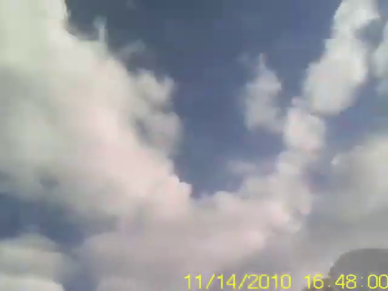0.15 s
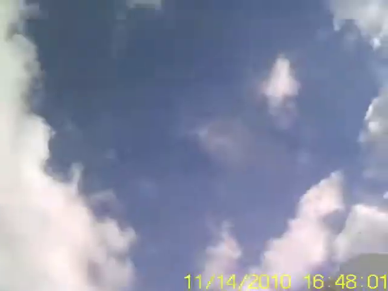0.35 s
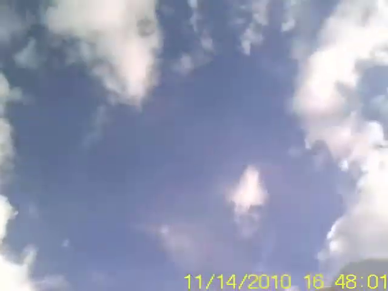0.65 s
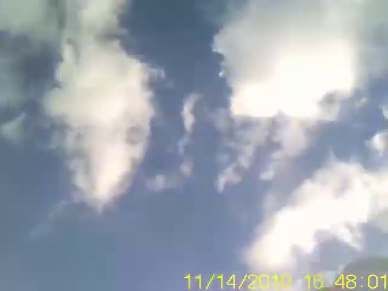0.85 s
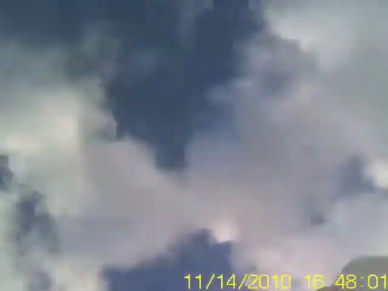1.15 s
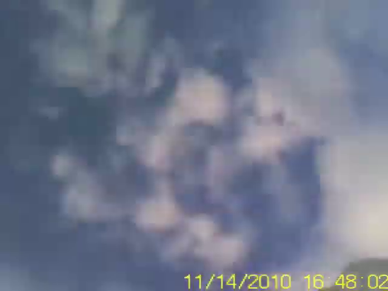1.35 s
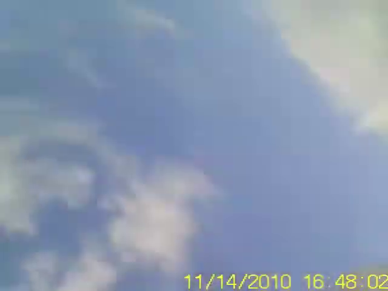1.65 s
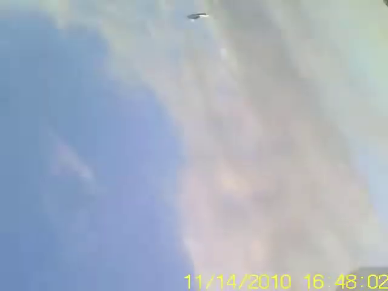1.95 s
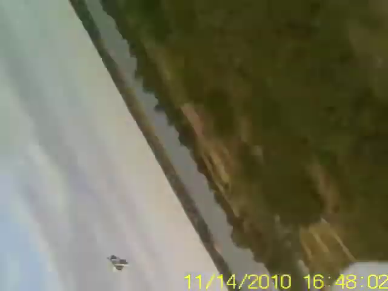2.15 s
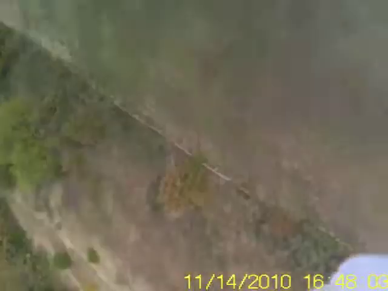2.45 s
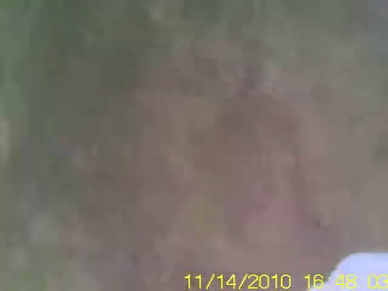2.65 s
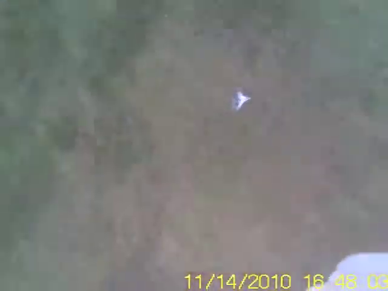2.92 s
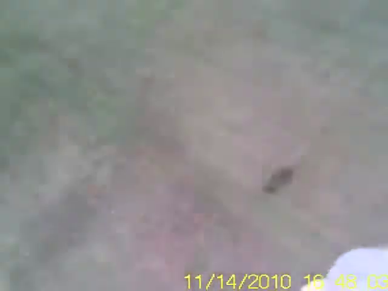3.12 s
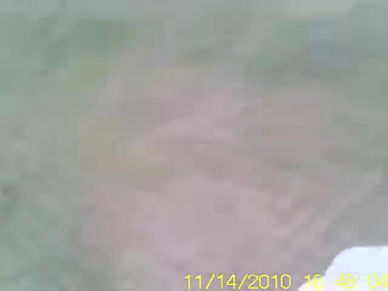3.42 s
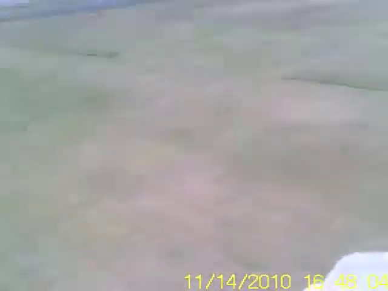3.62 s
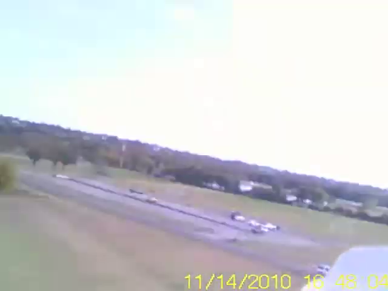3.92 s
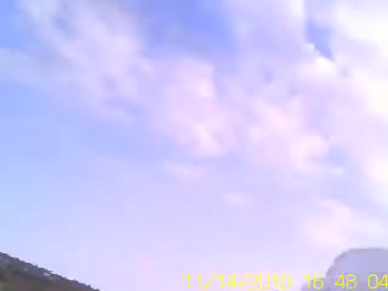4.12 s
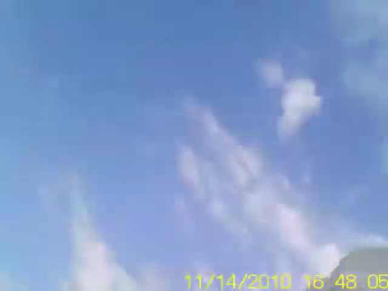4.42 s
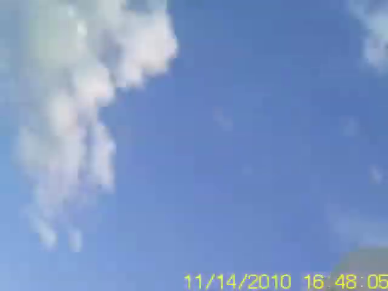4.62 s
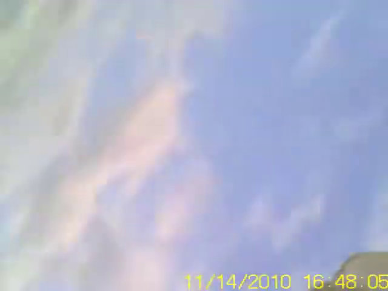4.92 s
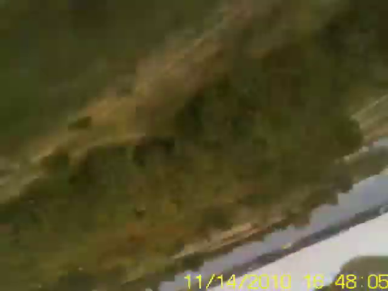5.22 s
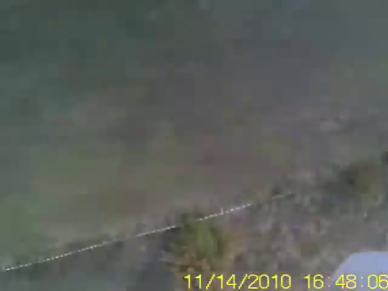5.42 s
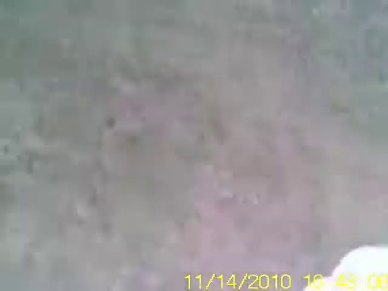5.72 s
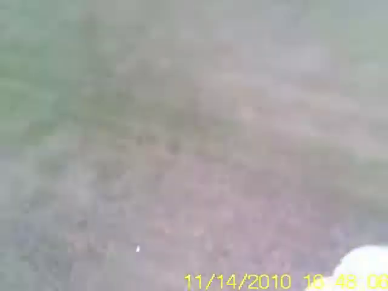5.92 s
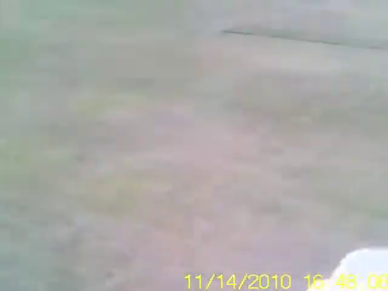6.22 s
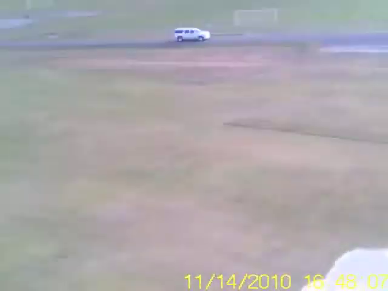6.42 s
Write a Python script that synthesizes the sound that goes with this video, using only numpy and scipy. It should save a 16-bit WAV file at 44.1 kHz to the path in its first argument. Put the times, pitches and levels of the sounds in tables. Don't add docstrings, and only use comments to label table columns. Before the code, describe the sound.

A small electric model aircraft buzzes close up in roaring air, cuts abruptly to faint after a hard wind slap, then gradually grows louder again.

```python
import sys
import numpy as np
from scipy import signal
from scipy.io import wavfile
from scipy.ndimage import uniform_filter1d

SR = 44100
rng = np.random.default_rng(int(sys.argv[2]) if len(sys.argv) > 2 else 0)


def persist_wave(psi):
    counts = np.round(np.clip(psi, -1, 1) * 32767).astype(np.int16)
    wavfile.write(sys.argv[1], SR, np.atleast_2d(counts).T)


def nominal_scale(level):
    x = np.asarray(level, float) / 20
    return 10 ** x


N = 289296


def rms_one(x):
    return x / np.sqrt(np.mean(x ** 2) + 1e-20)


def in_time(rows):
    s, *columns = np.transpose(rows)
    return [np.interp(np.arange(N) / SR, s, c) for c in columns]


def swells(rows):
    s, half, *columns = np.transpose(rows)
    coarse = np.arange(0, N + 64, 64) / SR
    bells = np.exp(-((coarse[:, None] - s) / half) ** 2)
    return [np.interp(np.arange(N) / SR, coarse, bells @ c) for c in columns]


def drift(rate_hz):
    r = np.exp(-40 * np.pi * rate_hz / SR)
    slow = signal.lfilter([1], [1, -2 * r, r * r], rng.standard_normal(N // 20 + 4002))[4000:]
    return np.interp(np.arange(N) / 20, np.arange(len(slow)), rms_one(slow))


def narrow_noise(rows, width_hz):
    hz, level_db = in_time(rows)
    turn = 2 * np.pi * np.cumsum(hz) / SR
    return nominal_scale(level_db) * (drift(width_hz) * np.cos(turn) + drift(width_hz) * np.sin(turn))


# [t/s, airspeed/dB, sideslip/dB, pull on the wing/dB]
FLIGHT_PATH = [(0.0, 2, 0.3, 4.5), (0.34, -1, 5.5, -1), (0.74, -4, -2.5, 1.5), (1.1, -2.0, -0.5, -1.5),
               (1.38, -3.5, -4, -4), (1.78, -4.0, -5, -1), (2.38, -3.5, -0.8, 3.5), (2.74, -1.5, 0.5, 6),
               (2.98, 2.5, 1.2, 2), (3.46, 5, -2, 1.5), (4.42, 5.5, -0.7, -3), (4.7, 2, 7, -0.5),
               (4.98, 1, 0.5, -3), (5.34, -1, -1, -4), (5.58, 2.4, 7, 1), (5.86, 4.5, 2, -5.5),
               (6.14, 1.1, 3, 0.5), (6.56, 4, -6.5, 9.5)]


def flying():
    return in_time(FLIGHT_PATH)


# [t/s, f/Hz]
SHAFT_SPEED = [(0, 269), (.12, 266.5), (.55, 266.5), (.7, 267.7), (1.95, 268.1), (2.35, 267.4),
               (2.85, 267.9), (3.0, 267.1), (3.5, 268.1), (4.4, 268.1), (4.7, 266.3), (5.12, 265.8),
               (5.22, 266.7), (5.7, 266.4), (5.85, 263.8), (6.1, 263.9), (6.4, 271.6), (6.56, 280)]


def shaft_angle(airspeed_db):
    speed_hz = in_time(SHAFT_SPEED)[0] + .13 * nominal_scale(airspeed_db) * drift(6)
    return 2 * np.pi * np.cumsum(speed_hz) / SR


SHAFT_ORDERS = [*range(1, 17), *range(18, 23), *range(24, 41, 2)]
# [level/dB rms, gain per dB of airspeed, of sideslip, of pull]
ORDER_LEVELS = [(-33, 0.01, -0.18, -0.22), (-30, 1.04, -0.27, -0.21), (-37.5, -1.27, 0.077, 0.39),
                (-26.5, -0.07, 0.098, 0.27), (-42, -0.23, 0.5, 0.21), (-25.5, 0.56, 0.27, 0.18),
                (-47.5, -0.4, 0.18, 1), (-33.5, 0.56, -1.34, 0.2), (-45, -1.1, 0.46, 0.76),
                (-26, -0.7, -0.026, -0.3), (-42.5, 0.53, -0.29, -0.54), (-30, 0.14, 0.31, -0.079),
                (-47.5, -0.2, 0.09, -0.04), (-29.5, -0.16, 0.17, -0.31), (-40.6, -0.02, 0.054, -0.11),
                (-50.2, -0.09, 0.52, 0.32), (-58, 0.7, -0.01, 0.26), (-61.5, 0.5, 0.29, 0.04),
                (-61.5, 1.5, -0.93, -0.05), (-49.5, 0.83, -0.21, -0.04), (-53, 1, 0.45, 0.04),
                (-54, 0.59, 0.19, 0.0), (-59.1, 1.2, -0.083, 0.26), (-59, 1.6, -0.39, -0.13),
                (-50.5, -0.5, 0.24, 0.4), (-50, -0.26, -0.11, 0.27), (-60.5, -1, -0.17, 0.47),
                (-56, 0.09, -0.06, 0.21), (-67, -3, 0.01, 0.01)]
# [level/dB rms, gain per dB of airspeed, of sideslip, of pull]
FIFTEENTH_ORDER = (-54.5, 0.5, .01, -0.1)
# [f/Hz, sharpness, sign]
AIRFRAME_MODES = [
    (2500, 5, 1),
    (3150, 10, 1),
    (3450, 10, -1),
]
LOWER_ORDER_BEATS = {"1": [(.53, 0.035, -3), (2.0, 0.32, 3.5), (3.3, 0.11, -5.5), (5.03, .07, 7),
                     (5.5, .04, -9)], "2": [(.55, .06, 1), (1.45, 0.14, 1.5), (2.4, .06, -3),
                     (5.95, 0.22, -7)], "3": [(.1, .15, 0.5), (1.3, 0.18, -1.5), (2.5, 0.13, -1.5),
                     (3.0, .15, 3), (3.33, 0.083, -15), (5.7, .04, -8), (5.93, .05, -12)],
                     "6": [(.8, 0.17, 2), (1.3, .15, -1), (2.25, .15, -0.5), (5.0, .3, -2)],
                     "8": [(.29, .05, -13), (2.55, .1, 3), (2.98, .06, -5), (3.23, 0.064, 2),
                     (4.62, .05, 3), (4.75, .07, -5), (5.56, .08, -6), (6.0, .08, 4), (6.17, .06, -5)],
                     "12": [(.95, .25, 2.5), (1.65, 0.11, -1.5), (2.15, 0.22, 3), (6.33, 0.087, -9)],
                     "14": [(.8, .2, 0.5), (2.5, 0.23, 2.5), (3.3, 0.35, 3), (6.47, 0.1, -9)]}
UPPER_ORDER_BEATS = {"20": [(.22, .12, 8), (3.2, .1, 6), (4.0, .25, 6), (5.2, .3, 6), (6.3, .2, 6)],
                     "22": [(.25, 0.17, 3.5), (1.4, .15, 4), (2.1, .3, -3), (5.2, .4, -3)],
                     "24": [(.75, 0.29, -7), (2.05, 0.27, 7), (2.47, 0.065, -10.5), (5.25, .2, -7),
                     (5.95, .2, 6)], "26": [(.55, .2, -4), (1.1, .1, 4), (5.1, .35, -7), (5.75, .15, 4.5)]}
CRUISE_HZ = 268


def propeller(angle, flight, rush_db, rough=0.0082, jitter_hz=70):
    shake = rough * nominal_scale(.8 * (rush_db + 31))
    beats = {**LOWER_ORDER_BEATS, **UPPER_ORDER_BEATS}
    levels = [*ORDER_LEVELS[:14], FIFTEENTH_ORDER, *ORDER_LEVELS[14:]]
    out = np.zeros(N)
    for order, (level_db, *follows) in zip(SHAFT_ORDERS, levels):
        odd = order % 2
        wander_db = (.2 + odd * min(order / 8, 1.3) + .6 * (order > 17)) * drift(1.5)
        level_db = level_db + wander_db + np.dot(follows, flight)
        if str(order) in beats:
            level_db += swells(beats[str(order)])[0]
        ratios = [(order * CRUISE_HZ / hz, q, sign) for hz, q, sign in AIRFRAME_MODES]
        lag = sum(sign * np.arctan2(r / q, 1 - r ** 2) for r, q, sign in ratios)
        lag += odd * np.pi / 2
        turn = order * angle - lag + .01 * order * (1 + 4 * odd) * drift(1.2)
        tone = (1 + shake * drift(jitter_hz)) * np.cos(turn) + shake * drift(jitter_hz) * np.sin(turn)
        out += np.sqrt(2) * nominal_scale(level_db) * tone
    return out


# [middle t/s, half length/s, level/dB]
CONTROLLER_SWELLS = [
    (.45, 0.11, -5),
    (.8, .2, 3),
    (2.42, 0.13, 2.5),
    (2.65, .08, -4),
    (4.82, 0.059, -5),
]
SWITCHING_HZ, SWITCHING_DB = 7607, -47


def controller(angle):
    chop = 1 + 0.049 * np.cos(angle) + 0.062 * np.cos(12 * angle)
    level_db = SWITCHING_DB + swells(CONTROLLER_SWELLS)[0] + .5 * drift(3.6)
    return np.sqrt(2) * nominal_scale(level_db) * chop * np.cos(2 * np.pi * SWITCHING_HZ * np.arange(N) / SR)


# [level/dB, gain per dB of airspeed, of sideslip, of pull]
AIR_LEVELS = [
    (-26, 1.24, 0.036, .52),
    (-32, 0.96, 0.59, -0.19),
    (-29.5, 0.62, 0.34, -0.049),
    (-42.5, 0.53, 0.047, -0.22),
]
# [middle t/s, half length/s, rumble level/dB, buffet level/dB, rush level/dB]
PASSING_EDDIES = [(.05, 0.045, -2, 6.5, 3), (.58, 0.17, 5, -0.5, 1), (.85, 0.079, -2, 5, 1.5),
                  (1.02, 0.056, -5, .1, 1), (1.25, 0.24, 0.5, 6.5, 1.5), (1.85, 0.29, -3, -10, 0.9),
                  (2.2, 0.14, 1.5, -2.5, 1.5), (2.57, 0.15, 2, 0.5, 1.3), (2.9, 0.04, 5, -3, 3),
                  (3.13, 0.12, -1, -2.5, 2.5), (3.45, 0.035, 6, 1.5, 5.5), (3.85, 0.16, 1.5, 4.5, 2.5),
                  (4.1, 0.33, 4, -2, 2), (4.54, 0.14, 0, 1.5, 4), (4.68, 0.074, -7, -4, -1),
                  (5.0, 0.12, 4.5, 11.5, 1), (5.2, 0.14, -2, -6, -2.5), (5.42, 0.11, 10, -10, .1),
                  (5.85, 0.16, 2, -6.5, 0.3), (6.2, .05, -4, 2, 1), (6.35, .06, 3, -3, -0.5)]
# [middle t/s, half length/s, hiss level/dB]
LEADING_EDGE_HISS = [
    (1.1, .07, 1.5),
    (1.95, .15, 2),
    (5.9, 0.17, 0),
    (6.35, 0.11, -2),
]


def air_levels(flight):
    rumble, buffet, rush = swells(PASSING_EDDIES)
    eddies = [rumble, buffet, rush, rush + swells(LEADING_EDGE_HISS)[0]]
    return [db + eddy + np.dot(follows, flight) for (db, *follows), eddy in zip(AIR_LEVELS, eddies)]


# [f/Hz, level/dB]
PORT_COLOUR = [(12, 28.5), (35, 22.5), (150, 18), (400, 13), (1000, 5.5), (2200, 5.5), (3700, 2.5),
               (4500, -12), (5100, -4.5), (6000, 7), (7300, -3.5), (8700, 9.5), (9800, 0.5), (10900, 13.5)]


def airflow(angle, levels_db, shed=0.72, patchy_db=1.2):
    white = rng.standard_normal((2, N + SR))
    edges = 14 * 2 ** np.r_[np.arange(0, 8, 1 / 3), np.arange(8, 9.7, 1 / 8)]
    puffs = rms_one(np.exp(.75 * np.cos(2 * angle + shed)) * nominal_scale(1.3 * drift(150)))
    colour_hz, colour = np.transpose(PORT_COLOUR)
    together, low, high = drift(13.0), 0, 0
    for k, (a, b) in enumerate(zip(edges, edges[1:])):
        hz = np.sqrt(a * b)
        band_pass = signal.butter(2, [a, b], "band", fs=SR, output="sos")
        band = signal.sosfilt(band_pass, white[k % 2])[SR:]
        place = np.interp(np.log(hz), np.log([55, 220, 900, 3700, 4700, 8000]), [0, 1, 2, 2, 2.5, 3])
        first = min(int(place), 2)
        level_db = levels_db[first] + (place - first) * (levels_db[first + 1] - levels_db[first])
        colour_db = np.interp(np.log(hz), np.log(colour_hz), colour)
        lumps_db = patchy_db * (together * max(1.6 - 0.97 * place, .2) + .5 * drift(9.8))
        low_shelf_db = -3.5 * np.clip(np.log2(160 / hz), 0, 1) - 3 * np.clip(np.log2(50 / hz), 0, 1)
        band = band * nominal_scale(level_db + colour_db + lumps_db + low_shelf_db)
        if hz < 5200:
            low = low + band
        else:
            high = high + band
    return low + signal.sosfilt(signal.butter(10, 9600, fs=SR, output="sos"), puffs * high)


def heave(rumble_db):
    return nominal_scale(rumble_db + 2.5) * drift(1.8)


# [f/Hz, width/Hz, level over the rush/dB]
HUMMING_PANELS = [
    (2060, 90, -15.5),
    (3138, 110, -16),
    (4590, 240, -26.5),
]


def panels(rush_db):
    hum = sum(narrow_noise([(0, hz, db), (N / SR, hz, db)], width) for hz, width, db in HUMMING_PANELS)
    return nominal_scale(rush_db) * hum


# [loudest t/s, slide/Hz per s, level/dB]
EDGE_WHISTLES = [
    (0.269, -4500, -48),
    (2.74, 4803, -48),
    (5.541, 5504, -47),
]
WHISTLE_HZ, WHISTLE_WIDTH_HZ = 9060, 450
WHISTLE_HOLD_S, WHISTLE_FADE_S, WHISTLE_FADE_DB = .13, .22, -4


def whistle():
    away = np.array([-2, -1, -.5, .5, 1, 2]) * (WHISTLE_HOLD_S + WHISTLE_FADE_S)
    away[2:4] = -WHISTLE_HOLD_S, WHISTLE_HOLD_S
    fade_db = WHISTLE_FADE_DB * np.array([8, 1, 0, 0, 1, 8])
    out = 0
    for s, slide, db in EDGE_WHISTLES:
        hz = np.clip(WHISTLE_HZ + slide * away, 8000, 10800)
        out = out + narrow_noise(np.c_[s + away, hz, db + fade_db], WHISTLE_WIDTH_HZ)
    return out


# [start t/s, length/s, pressure]
PORT_SHOVES = [
    (0.91, .04, .14),
    (1.0, .02, .13),
    (1.025, .06, -.08),
    (1.12, .07, .1),
    (3.125, .03, .22),
    (3.414, .06, -.36),
    (3.419, .007, .1),
    (3.426, .045, -.08),
    (3.448, .02, -.14),
    (3.66, .06, -.25),
]


def gusts():
    t = np.arange(N) / SR
    out = np.zeros(N)
    for start, length, pressure in PORT_SHOVES:
        out += pressure * (np.tanh((t - start) / .0015) - np.tanh((t - start - length) / .008)) / 2
    return out


# [t/s, f/Hz, level/dB]
FLOW_BURSTS = [
    (4.42, 444, -60),
    (4.48, 445.3, -28.5),
    (4.6, 453.5, -25),
    (4.68, 450, -60),
    (5.44, 298, -60),
    (5.455, 303, -19.5),
    (5.5, 301, -27),
    (5.58, 304, -23),
    (5.63, 298, -60),
]


def bursts():
    return narrow_noise(FLOW_BURSTS, 170)


# [t/s, f/Hz, level/dB]
PANEL_FLUTTER = [
    (4.74, 210, -53),
    (4.8, 202, -21),
    (4.9, 142.5, -22),
    (5.03, 160.5, -30),
    (5.09, 193, -60),
]


def flutter():
    return narrow_noise(PANEL_FLUTTER, 45)


# [t/s, f/Hz, level/dB]
CANOPY_HISS = [
    (5.5, 4500, -65),
    (5.7, 4500, -46.5),
    (6.1, 4530, -43),
    (6.25, 4500, -65),
]


def canopy():
    return narrow_noise(CANOPY_HISS, 260)


def scene():
    flight = flying()
    angle = shaft_angle(flight[0])
    levels_db = air_levels(flight)
    rumble_db, rush_db = levels_db[0], levels_db[2]
    drive = propeller(angle, flight, rush_db) + controller(angle)
    air = airflow(angle, levels_db) + heave(rumble_db) + panels(rush_db) + whistle() + gusts()
    air += bursts() + flutter() + canopy()
    return (drive + air)[None]


def roll_off(x):
    return signal.sosfilt(signal.butter(12, 10890, fs=SR, output="sos"), x)


GAIN_DROP_S, GAIN_DROP_DB, GAIN_RISE_DB_PER_S = 3.4551, -30, 3.3
CUTOFF_HZ = 10900


def record(dry):
    since = np.arange(N) / SR - GAIN_DROP_S
    gain_db = np.where(since < 0, 0, GAIN_DROP_DB + GAIN_RISE_DB_PER_S * since)
    gain = uniform_filter1d(nominal_scale(gain_db), 14)
    coupled = signal.lfilter(*signal.butter(1, 1.2, "high", fs=SR), dry)
    loud = 1.3 * np.tanh(coupled / 1.3) * gain
    cut = signal.sosfilt(signal.cheby2(12, 70, CUTOFF_HZ * 1.07, fs=SR, output="sos"), loud)
    return roll_off(cut)


dry = scene()
out = record(dry)
persist_wave(out)
```